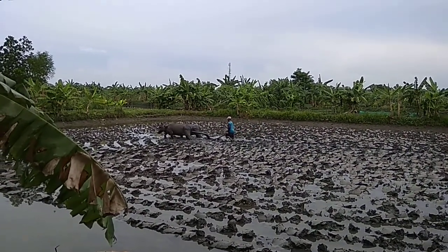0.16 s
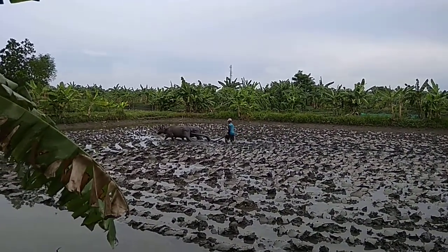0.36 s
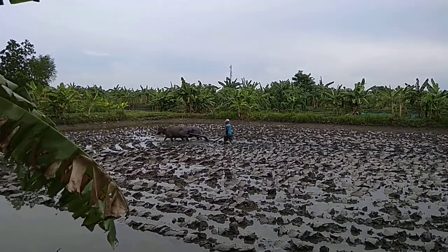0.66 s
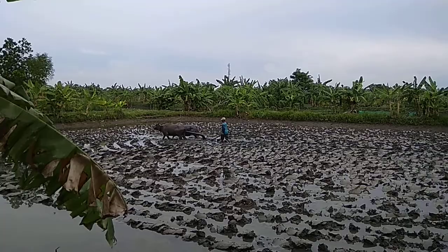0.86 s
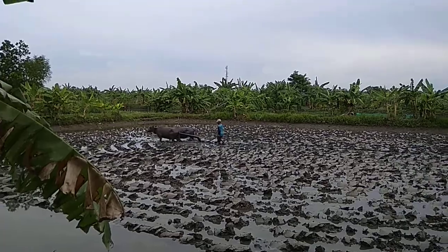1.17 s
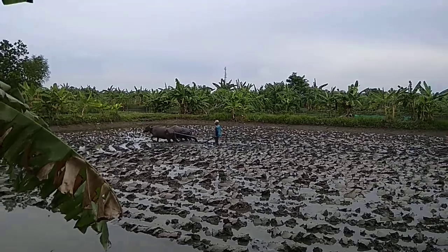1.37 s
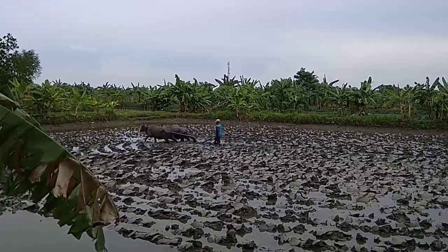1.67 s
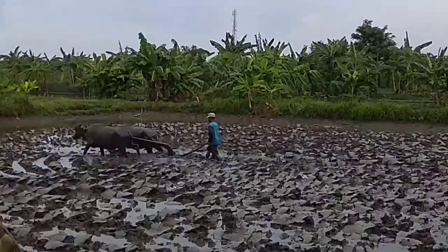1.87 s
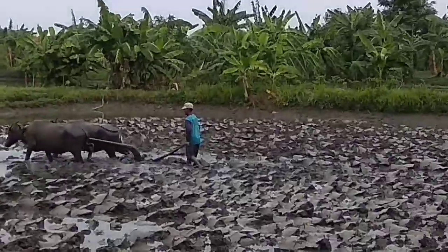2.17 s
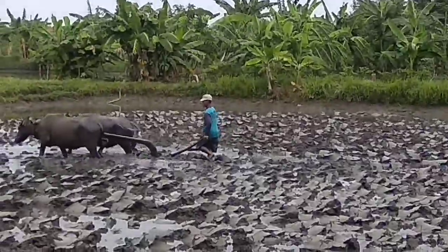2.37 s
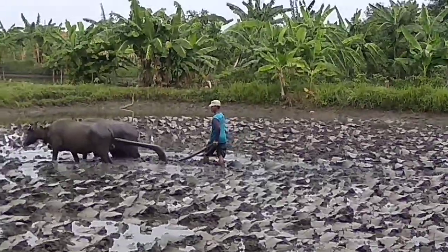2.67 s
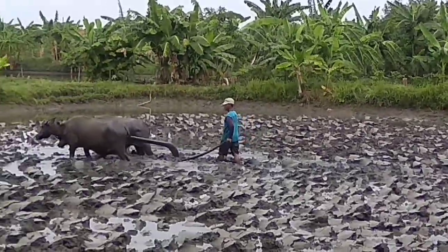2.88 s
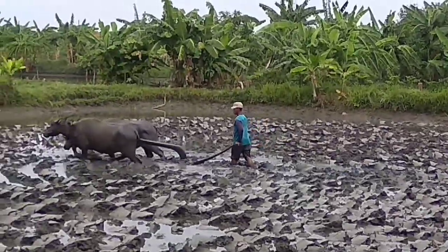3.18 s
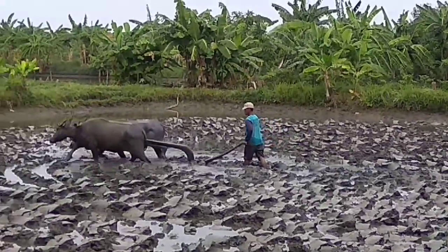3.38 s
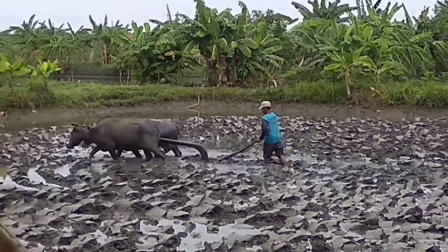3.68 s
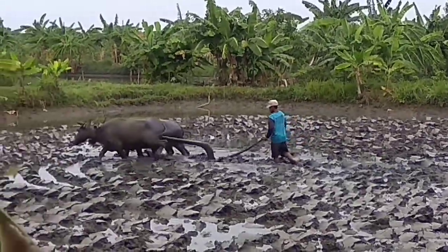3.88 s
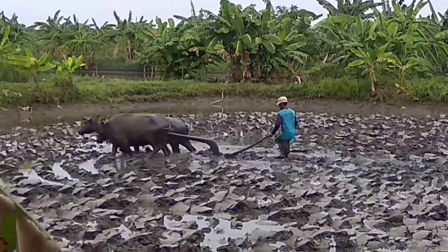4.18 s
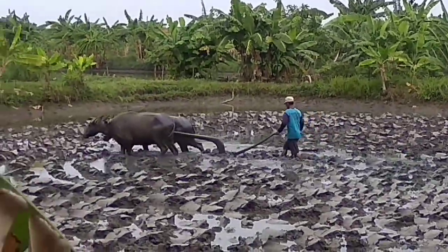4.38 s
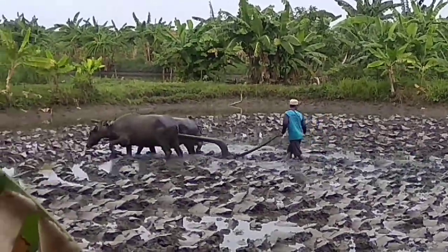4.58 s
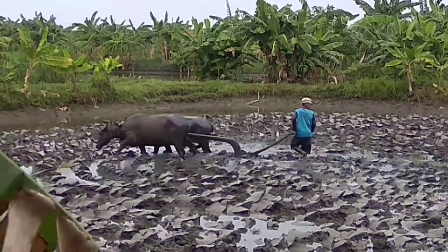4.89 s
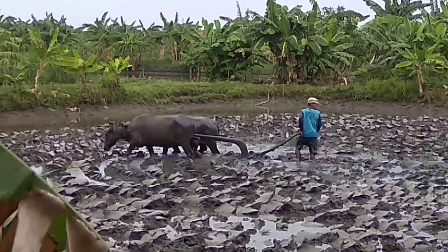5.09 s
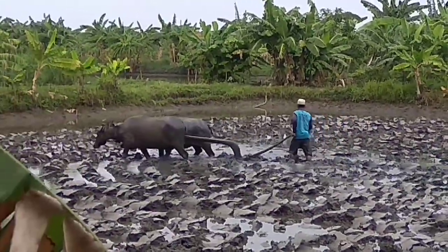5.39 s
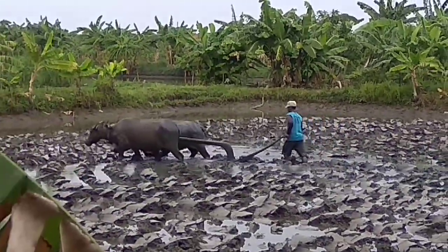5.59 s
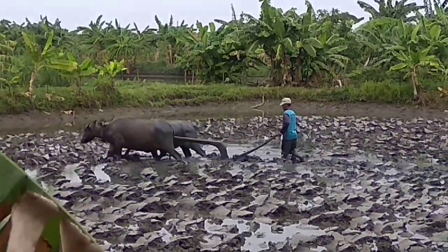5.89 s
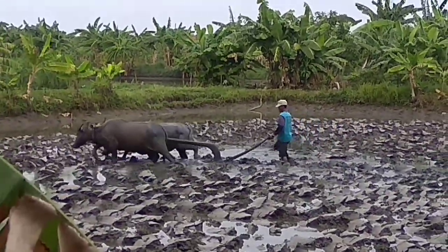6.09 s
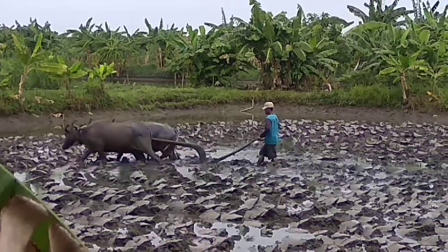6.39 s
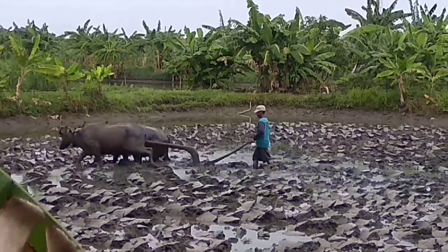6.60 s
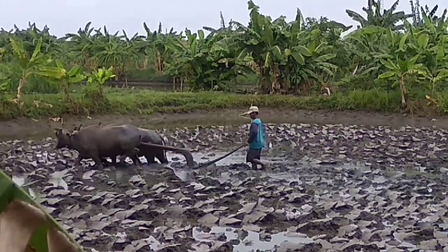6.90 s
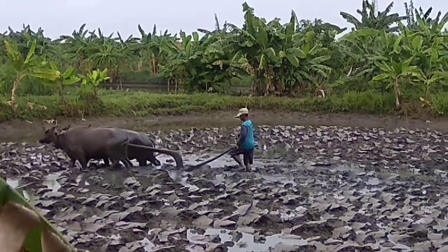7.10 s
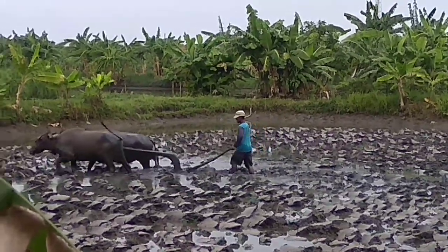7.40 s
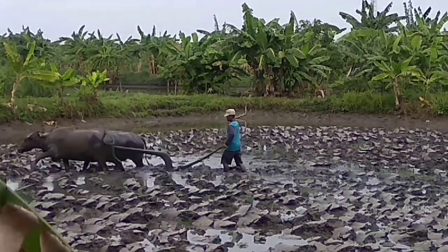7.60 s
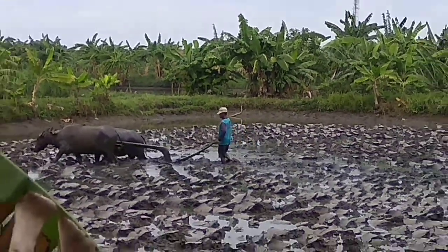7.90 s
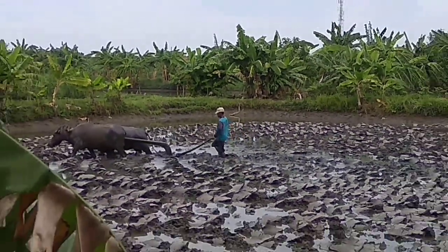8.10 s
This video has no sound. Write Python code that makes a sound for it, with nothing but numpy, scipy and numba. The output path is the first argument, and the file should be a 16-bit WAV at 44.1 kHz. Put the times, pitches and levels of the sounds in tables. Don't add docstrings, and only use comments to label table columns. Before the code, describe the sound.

Outdoors by a muddy field, one small motorbike already drones off over low distant murmur. A nearer single-cylinder bike pulls away, its separate exhaust pops quickening into a buzzing, climbing drone, with another following. Tyre hiss, leaves and wet splashes surround them. Near six seconds the throttle shuts; the sound drops quickly to soft bumps, knocks and mud rattles. Phone microphone, engines leaning left, treble patchy.

```python
import sys
import numpy as np
from scipy import signal
from scipy.io import wavfile
from scipy.ndimage import uniform_filter1d
from numba import njit

SR = 44100
rng = np.random.default_rng(int(sys.argv[2]) if len(sys.argv) > 2 else 0)


def materialize(psi):
    bounded = np.clip(np.atleast_2d(psi).T, -1, 1)
    quanta = np.round(bounded * 32767).astype(np.int16)
    wavfile.write(sys.argv[1], SR, quanta)


def voltage_ratio(level):
    return 10 ** (np.asarray(level, float) / 20)


N = 363808
TIME = np.arange(N) / SR
SHUT_S = 6.2


def level(x, db):
    return x * voltage_ratio(db) / np.sqrt(np.mean(x ** 2))


def columns(table):
    s, *rest = np.transpose(table)
    return [np.interp(TIME, s, c) for c in rest]


def colour(points, hz, column=1):
    points = np.array(points)
    return np.interp(np.log(hz), np.log(points[:, 0]), points[:, column])


def left_right(db):
    return voltage_ratio(np.array([[db], [-db]]) / 2)


@njit
def resonate(x, hz, width, low=0.):
    y, b, l = np.empty(len(x)), 0., 0.
    g, k = np.tan(np.pi * hz / SR), width / hz
    for i in range(len(x)):
        v = (b + g * (x[i] - l)) / (1 + g * (g + k))
        y[i] = k * (v + low * (l + g * v))
        b, l = 2 * v - b, l + 2 * g * v
    return y


def band(hz, width):
    once = resonate(rng.standard_normal(N), 1. * hz, 1. * width)
    return level(resonate(once, 1. * hz, 1. * width), 0)


def walk(rate):
    k = int(SR / rate)
    steps = np.repeat(rng.standard_normal(SR)[:N // k + 1], k)[:N]
    return 1.3 * uniform_filter1d(uniform_filter1d(steps, k), k)


# pitch_hz, level_db (per Hz)
MURMUR = [(15, -47), (25, 10), (70, 17), (222, 14.5), (261, 4), (281, 7), (361, 5.5), (383, -19.5),
          (507, 4), (760, -34), (1100, -76), (1870, -120)]
# start_s, level_db
DISTANCE = [(0, -2), (.35, -3.5), (1.2, -0.5), (1.65, -0.5), (3.2, 1), (3.9, -1), (5.4, -5), (6.2, -7.5),
            (8.25, -19)]


def field():
    out = 0
    for hz in 30 * 2 ** np.arange(0, 5, .5):
        throb_db = np.minimum(2.5 + hz / 250, 3.6) * walk(9)
        db = colour(MURMUR, hz) + 10 * np.log10(hz) + throb_db
        middle = band(hz, hz / 4)
        side = hz / 1200 * band(hz, hz / 4) * np.array([[1], [-1]])
        out = out + voltage_ratio(db) * (middle + side)
    return level(out, -43.5 + 8) * voltage_ratio(0.67 * columns(DISTANCE)[0])


# pitch_hz, width_hz, level_db
PIPE = [(72.5, 9.4, -12), (137.5, 29, -4), (174, 110, -8), (202.5, 36, -6.5), (285, 48, 7), (324.5, 46, 3),
        (385, 80.6, 12), (440, 180, -24)]


def ring(x, modes):
    return sum(voltage_ratio(db) * resonate(x, 1. * hz, 1. * width, 1.5) / width for hz, width, db in modes)


MULTIPLES = (2, 3, 4, 5, 6, 7)
# pitch_hz, level_db
BOOM = [(30, -34), (55, -26.5), (75, 0.5), (105, 2.5), (154, -1.5), (167, 3.5), (184, 3), (240, -9)]


def bike(speed, table, multiple_db, start, jitter_s=.0001, scatter_db=-0.56, wobble_db=1.0,
         blast_s=0.0025, far_db=-8, late=0):
    (hz,), (bark_db, over_db) = columns(speed), columns(table)
    on = uniform_filter1d(1. * (TIME >= table[0][0]) * (TIME <= table[-1][0]), size=2000)
    turns = start + np.cumsum(hz * (TIME >= table[0][0])) / SR
    fired = np.flatnonzero(np.diff(np.floor(turns)))
    chance = rng.standard_normal((600, 2))[:len(fired)].T
    blasts = np.zeros(N)
    moment = fired + (jitter_s * SR * chance[0]).astype(int)
    blasts[np.clip(moment, 0, N - 1)] = voltage_ratio(scatter_db * chance[1])

    ground_bounce = voltage_ratio(-11) * np.roll(blasts, int(0.00567 * SR))
    trees = voltage_ratio(-16.5) * np.roll(blasts, int(0.01355 * SR))
    returned = blasts + ground_bounce + trees
    puff = signal.fftconvolve(returned / np.sqrt(hz), np.hanning(int(blast_s * SR)), "same")
    throat = ring(puff, [(630, 21, 3.5)]) / (1 + np.exp(34 - hz))
    pipe = ring(puff, PIPE) + throat + voltage_ratio(-36) * puff

    drone = 0
    for k, db in zip(MULTIPLES, multiple_db):
        drone_db = bark_db + over_db + db + colour(BOOM, k * hz) + wobble_db * walk(9.1)
        drone = drone + voltage_ratio(drone_db) * np.cos(2 * np.pi * k * (turns - late))
    near = on * (voltage_ratio(bark_db + 3.5) * level(pipe, 0) + drone)

    lag = np.arange(SR // 4) / SR
    echoes = rng.standard_normal((2, len(lag))) * np.exp(-lag / .07) * (lag > .012)
    smear = signal.fftconvolve(near[None], echoes + 0.81 * echoes.mean(0), axes=1)[:, :N]
    return near + smear * voltage_ratio(far_db) * near.std() / smear.std(), blasts


# start_s, bark_db, drone_over_bark_db
AHEAD = [(0, -46.5, 14), (.3, -46, 12.5), (.37, -52, 14), (.47, -50, 16), (0.8, -58.5, 19), (1.3, -88, 9)]
# start_s, firing_rate_hz
AHEAD_SPEED = [
    (0, 34.8),
    (.6, 37.1),
    (1.3, 39.3),
]
AHEAD_DRONE_DB = (-3.5, -24, 3, -7, -20, -24)


def ahead_bike():
    return bike(AHEAD_SPEED, AHEAD, AHEAD_DRONE_DB, start=0.77, jitter_s=0.00061, scatter_db=1.0,
                wobble_db=-2.0, blast_s=0.0036, far_db=-5.5)[0]


# nearest_level_db, share_of_distance_loss, drop_after_shut_db, drop_time_s
ROLL = [
    (-45.5, 1.034, -19, 0.39),
    (-53, 0.99, -14.5, 0.6),
    (-53, 1.5, 1.5, 0.78),
]
# pitch_hz, left_db, right_db
PORTS = [(580, 0, -7.5), (894, -6.5, -9.5), (1680, 2.5, -8), (2520, -2.5, -6.5), (3380, 6.5, 1.5),
         (5020, -1, -1.5), (6040, -3, -8), (7400, 3, 0.5), (10100, 6.5, 7.5), (12400, -3.5, 4),
         (14100, -5.5, -11.5), (15800, -28, 0)]


def rolling():
    shut = np.maximum(TIME - SHUT_S, 0)
    away_db = columns(DISTANCE)[0]
    layers_db = [db + share * away_db + drop_db * (1 - np.exp(-shut / drop_s))
                 for db, share, drop_db, drop_s in ROLL]
    out, swell = np.zeros((2, N)), walk(5)
    for hz in np.append(620 * 2 ** np.arange(0, 4.7, 1 / 3), 14000):
        layer_db = layers_db[int(hz > 3000) + int(hz > 6500)]
        flicker, common = walk(14), band(hz, hz / 3)
        share = .75 if hz < 800 else -.5 * (hz < 2400)
        for ch in range(2):
            db = colour(PORTS, hz, 1 + ch) + 0.6 * swell + 1.3 * flicker
            shared = (share if ch else abs(share)) * common
            out[ch] += voltage_ratio(layer_db + db - 5.3) * (band(hz, hz / 3) + shared)
    low = np.array([resonate(resonate(v, 800., 620.), 800., 620.) for v in out])
    return out + .8 * np.roll(low, int(.00806 * SR), axis=1)


# middle_s, level_db, half_length_s, pitch_hz, width_hz
RUSTLE = [(.3, -54, 0.26, 6800, 2090), (1.15, -60.5, 0.7, 6350, 1800), (1.76, -52, 1, 2470, 700),
          (3.25, -56, 0.12, 1850, 450), (6.55, -69, 0.036, 1800, 450), (6.88, -68, 0.092, 5700, 1700),
          (7.14, -69.5, 0.13, 5800, 1700), (7.15, -66, 0.29, 9900, 4000), (7.266, -74.5, 0.063, 3770, 450),
          (7.1, -73, 0.072, 3660, 400), (7.84, -78, 0.048, 3900, 500), (6.7, -65.5, 0.3, 680, 200),
          (7.096, -63, 0.071, 560, 330), (8.15, -68.5, 0.13, 780, 300), (6.29, -63, 0.064, 1900, 620),
          (0.029, -53, 0.098, 2400, 2200), (0.72, -64, 0.45, 2700, 1700), (4.5, -76, .03, 2600, 300),
          (6.726, -75, 0.099, 2500, 500), (6.89, -73, 0.033, 3300, 900), (7.09, -73, 0.036, 2000, 580),
          (5.26, -46, 0.076, 543, 160), (7.28, -76, 0.046, 1270, 200), (7.79, -74, .02, 1100, 220),
          (6.4, -64, 0.054, 690, 300), (7.56, -78, .025, 3000, 700), (3, -48, 0.69, 14800, 920)]


def rustle():
    out = 0
    for s, db, half, hz, width in RUSTLE:
        swell = voltage_ratio(db + 1.4 * walk(6.3) + 1.8 * walk(35)) * np.exp(-((TIME - s) / half) ** 2)
        out = out + swell * np.array([band(hz, width) for _ in range(2)])
    return out


# start_s, peak_db, pitch_hz, spray_db
SPLASH = [(0.31, -56, 1550, -47), (1.01, -36, 1620, -52), (1.2194, -66, 1830, -51), (2.695, -31, 1280, -50),
          (5.865, -42, 1680, -61), (6.37, -46, 1500, -57), (6.495, -57, 3080, -55), (6.54, -45, 1540, -72),
          (6.79, -76, 1132, -65), (6.875, -45, 1200, -65), (7.051, -50, 1240, -69), (7.364, -70, 1240, -61),
          (7.54, -54, 1150, -64), (7.6215, -67, 1269, -67), (7.8, -64, 2900, -60.5), (7.835, -81, 974, -74),
          (7.9783, -50, 1209, -61.5)]
MUD_LEFT_DB = 7


def splashes():
    out = np.zeros((2, N))
    spray = np.array([band(10300, top) + .08 * band(3600, 2400) + high * band(14000, 4000)
                      for top, high in ((3000, .1), (6000, .5))])
    grain = voltage_ratio(3 * walk(70))
    for s, db, hz, spray_db in SPLASH:
        age = np.maximum(TIME - s, 0)
        rise = (1 - np.exp(-age / 0.0024)) * grain
        wet = (band(hz, 500) + 0.55 * band(3300, 2600)) * voltage_ratio(db - 20.5) * left_right(MUD_LEFT_DB)
        wet_fade = np.exp(-(age / 0.053) ** 2)
        spray_fade = np.exp(-(age / 0.068) ** 2)
        out += rise * (wet_fade * wet + spray_fade * voltage_ratio(spray_db - 2.5) * spray)
    return out


# start_s, bark_db, drone_over_bark_db
LEAD = [(0.5, -41, 11), (0.72, -38, -3), (0.87, -36, -7), (1.25, -33.5, -0.5), (1.43, -36, -4.5),
        (1.55, -32, -1), (1.86, -31, -17), (2.33, -31, -14), (2.47, -30.5, -2), (2.97, -31.5, -14.5),
        (3.8, -33, -10), (4.68, -37, -11.5), (5.5, -43, 0), (6.24, -46.5, 5.5), (6.35, -65.5, 23.5),
        (6.84, -60.5, 22.5), (6.89, -69, -2), (7.1, -75, 7)]
# start_s, firing_rate_hz
LEAD_SPEED = [(0.5, 13.203), (0.76, 21.425), (1.04, 30.034), (1.2, 33.045), (1.47, 31.818), (1.75, 34.616),
              (2.1, 34.76), (2.35, 32.727), (2.55, 33.413), (2.7, 33.968), (3.39, 37.006), (3.9, 39.234),
              (4.6, 42.263), (5.61, 46.222), (6.29, 48.875), (6.5, 39.683), (6.94, 30.841), (8.25, 32.3)]
COAST_DB = (-5, 15.5, 17.5, -19.5, -15, -21)


def lead_bike():
    pulling_db = (6.5, -12.5, -19.5, 5.5, -10.0, -13.0)
    multiple_db = [db + coast_db * (TIME > SHUT_S + .08) for db, coast_db in zip(pulling_db, COAST_DB)]
    late = .36 * np.clip((TIME - SHUT_S) * 10, 0, 1)
    return bike(LEAD_SPEED, LEAD, multiple_db, start=.401, late=late, wobble_db=-1.5)


def lug(blasts):
    hz, bark_db = columns(LEAD_SPEED)[0], columns(LEAD)[0]
    thump_hz, width_hz = 132., 38.
    thump = resonate(blasts, thump_hz, width_hz, 0.31)
    thump = resonate(thump, thump_hz, 1.7 * width_hz)
    return level(thump, 3) * voltage_ratio(bark_db) / (1 + np.exp((hz - 25.5) / 0.89))


def growl(blasts):
    tail = np.arange(SR // 20) / SR
    puff = signal.fftconvolve(blasts, tail * np.exp(-tail / .012))[:N]
    return voltage_ratio(columns(LEAD)[0] - 11.5) * level(puff * band(338, 356), 0)


def valve(blasts, lag_s=0.0098, db=-19, db_per_hz=0.78):
    hz, bark_db = columns(LEAD_SPEED)[0], columns(LEAD)[0]
    fade = np.exp(-np.arange(400) / SR / .002)
    puff = signal.fftconvolve(np.roll(blasts, int(lag_s * SR)), fade)[:N]
    tick = np.array([level(puff * band(1850, 900), 0) for _ in range(2)])
    return voltage_ratio(bark_db + db + db_per_hz * (hz - 40)) * tick * (TIME < SHUT_S)


# start_s, bark_db, drone_over_bark_db
SECOND = [(1.001, -58.5, 18), (1.3, -40, 5), (2.05, -38, -36), (2.4, -39.5, 2), (2.7, -37, -24),
          (3.299, -34, -48), (3.901, -36.5, -3), (4.4, -44.5, 3.5), (5.4, -49.5, 8.5), (6.4, -69, 13),
          (6.95, -65.5, -3.5), (7.249, -53.5, -10.5), (7.45, -54, 14), (7.65, -56.5, 7), (7.85, -58, -4),
          (8.25, -52.5, -3)]
# start_s, firing_rate_hz
SECOND_SPEED = [(1.0, 25.367), (1.64, 28.974), (2.05, 29.592), (2.4, 28.481), (2.7, 27.955), (3.0, 28.9),
                (3.3, 29.623), (3.9, 32.072), (4.9, 34.982), (5.9, 36.698), (6.4, 36.649), (7.0, 37.739),
                (7.3, 34.995), (8.25, 36.388)]


def second_bike():
    return bike(SECOND_SPEED, SECOND, (-1.0, -10.5, -4.5, -4.0, -17, -36), start=.059,
                scatter_db=3.0, wobble_db=0.5)[0]


def struck(table, trim_db, ring_s):
    out, age = np.zeros(N + SR), np.arange(SR // 20) / SR
    for s, db, hz in table:
        first = int(s * SR)
        tap = np.exp(-age / ring_s) * np.sin(2 * np.pi * hz * age)
        out[first:first + len(age)] += voltage_ratio(db + trim_db) * tap
    return out[:N]


# start_s, peak_db, pitch_hz
CLACKS = [(3.2914, -33, 1742), (3.5867, -34, 1937), (4.1245, -35, 2160), (4.1993, -33, 2060),
          (4.2736, -38, 1900), (4.3704, -35, 1860), (4.4188, -38, 2110), (4.5395, -29.5, 1660),
          (4.5625, -37, 1450), (4.6089, -49, 1383), (4.6572, -44, 1640), (4.6797, -43, 1620),
          (4.7041, -51, 1650), (4.7276, -41, 1490), (4.7745, -38, 1640), (4.7974, -42, 1770),
          (4.8433, -36, 2150), (4.8907, -36, 1710), (4.9137, -45, 1690), (4.9371, -35, 1550),
          (5.0055, -41, 1670), (5.0279, -36, 2130), (5.0733, -36, 2040), (5.0962, -41, 2070),
          (5.2314, -34, 2240), (5.2988, -34, 1630), (5.3422, -49, 1450), (5.3641, -41, 1570),
          (5.5188, -40, 1640), (5.6041, -45, 1600), (5.9034, -40, 2022), (6.0122, -45, 1570),
          (6.072, -45, 1900), (6.1134, -44, 2050), (6.1553, -45, 1900), (6.1763, -37, 1960)]
# start_s, peak_db, pitch_hz
KNOCKS = [(6.524, -55, 522), (6.557, -51, 526), (6.594, -57, 522), (6.629, -56.5, 522), (6.664, -51, 535),
          (6.699, -47, 657), (6.733, -56, 522), (6.876, -44, 522), (7.068, -48.5, 522), (7.173, -58, 522),
          (7.338, -52, 637), (7.757, -64, 522), (8.046, -51, 579), (8.116, -53, 659), (8.182, -56, 626)]


def taps():
    metal = struck(CLACKS, trim_db=-2, ring_s=0.0027)
    knock = struck(KNOCKS, trim_db=2, ring_s=0.0034)
    return left_right(10.5) * np.array([metal + knock, np.roll(metal, 8) + knock])


# start_s, peak_db, pitch_hz, ring_time_s
BUMPS = [(6.31, -48.5, 635, 0.013), (6.765, -45, 302, 0.0085), (6.838, -46, 113.7, 0.016),
         (6.898, -33, 106, 0.0083), (7.022, -32.5, 191, 0.0053), (7.297, -35, 128, 0.0069),
         (7.36, -57, 630, 0.017), (7.413, -36, 168, 0.012), (7.501, -40.5, 160, 0.015),
         (7.54, -62, 649, 0.016), (7.633, -45, 188, 0.011), (7.983, -42.5, 239, 0.011),
         (8.061, -57, 503, 0.015), (8.11, -64, 666, 0.015), (8.196, -47, 354, 0.011)]


def bumps():
    out = np.zeros(N)
    for s, db, hz, ring_s in BUMPS:
        age = np.maximum(TIME - s, 0)
        swell = np.e * age / ring_s * np.exp(-age / ring_s)
        out += voltage_ratio(db) * swell * np.sin(2 * np.pi * hz * age)
    return out


# start_s, hold_s, level_db
RATTLE = (7.364, 0.09, -59.5)
# pitch_hz, width_hz, level_db
RATTLE_BODY = [(1200, 400, 0.5), (1540, 200, -5.5), (1850, 120, -0.5), (3140, 220, -11), (4230, 1100, -4),
               (2600, 3500, -16)]


def rattle():
    s, hold, db = RATTLE
    age = np.maximum(TIME - s, 0)
    release = np.exp(-np.maximum(age - hold, 0) / .03)
    shape = (1 - np.exp(-age / 0.0021)) * np.exp(-age / 0.051) * release
    body = sum(voltage_ratio(top_db + 2 * walk(60)) * band(hz, width) for hz, width, top_db in RATTLE_BODY)
    return voltage_ratio(db) * left_right(MUD_LEFT_DB) * shape * body


def scene():
    lead, blasts = lead_bike()
    low = field() + ahead_bike() + lead + lug(blasts) + growl(blasts) + second_bike() + bumps()
    high = rolling() + rustle() + splashes() + valve(blasts) + taps() + rattle()
    return low * left_right(4.2) + high


# pitch_hz, left_db, right_db
GATE = [(560, -71.5, -65), (940, -71, -76), (1250, -75, -80), (2030, -71, -100), (4200, -80, -90),
        (6100, -99, -86), (10160, -66.5, -81), (11000, -96.5, -106), (15800, -71, -92)]


def suppress(x):
    hz, _, z = signal.stft(x, SR, nperseg=1024)
    gate = np.array(GATE)
    gate_db = np.array([np.interp(hz, gate[:, 0], gate[:, k]) for k in (1, 2)])[..., None]
    heard = uniform_filter1d(uniform_filter1d(np.abs(z) ** 2, size=5, axis=1), size=5, axis=2)
    guess = uniform_filter1d(rng.standard_normal(z.shape), size=6, axis=1)
    guess = uniform_filter1d(guess, size=13, axis=2)
    margin_db = 10 * np.log10(heard + 1e-18) - gate_db - 9.6 * guess / guess.std()
    z *= np.where(hz[:, None] > 640, voltage_ratio(np.clip(4 * margin_db, -26, 0)), 1)
    return signal.istft(z, SR, nperseg=1024)[1][:, :N]


def low_pass(x):
    return signal.sosfilt(signal.butter(12, 15700, fs=SR, output="sos"), x)


def record(dry):
    x = signal.sosfilt(signal.butter(3, 42, "high", fs=SR, output="sos"), dry)
    hiss = signal.sosfilt(signal.butter(6, 10800, fs=SR, output="sos"), rng.standard_normal(dry.shape))
    whine = np.array([band(10300, 900) for _ in range(2)])
    x = suppress(x) + voltage_ratio(-99) * hiss + voltage_ratio(-92 + 2.0 * walk(7.9)) * whine
    x = signal.sosfilt(signal.butter(10, 15300, fs=SR, output="sos"), x)
    return low_pass(x)


dry = scene()
out = record(dry)
materialize(out)
```